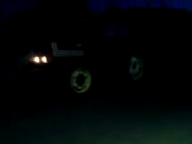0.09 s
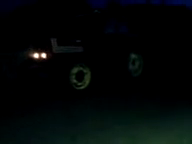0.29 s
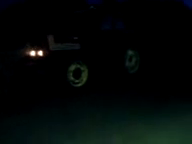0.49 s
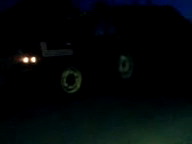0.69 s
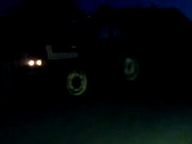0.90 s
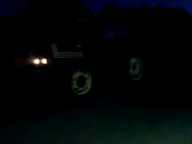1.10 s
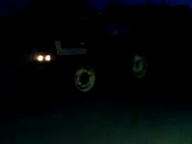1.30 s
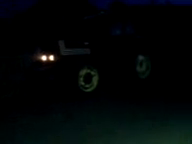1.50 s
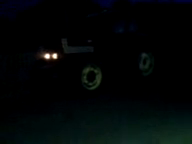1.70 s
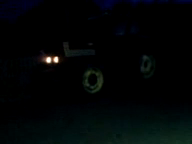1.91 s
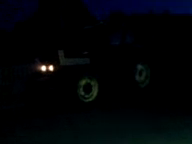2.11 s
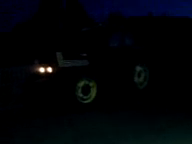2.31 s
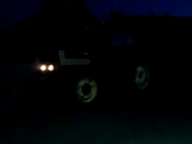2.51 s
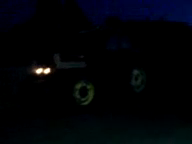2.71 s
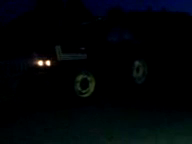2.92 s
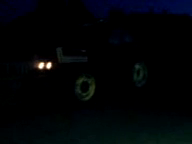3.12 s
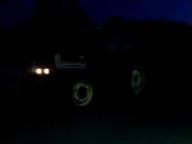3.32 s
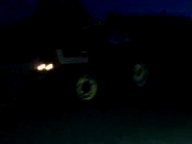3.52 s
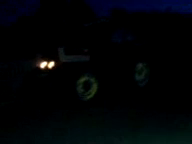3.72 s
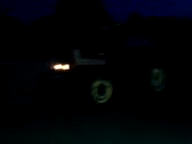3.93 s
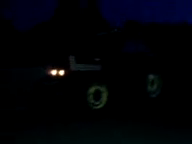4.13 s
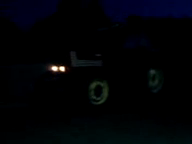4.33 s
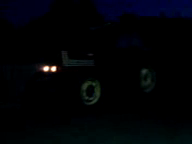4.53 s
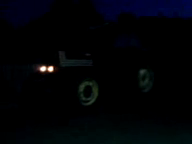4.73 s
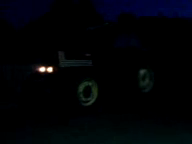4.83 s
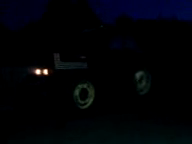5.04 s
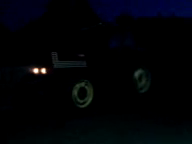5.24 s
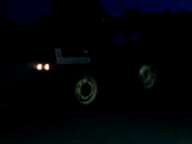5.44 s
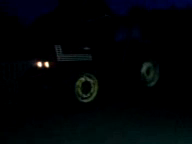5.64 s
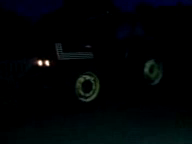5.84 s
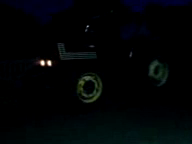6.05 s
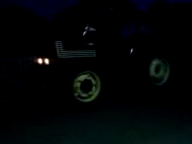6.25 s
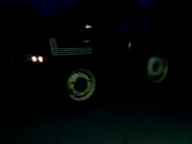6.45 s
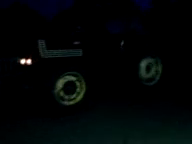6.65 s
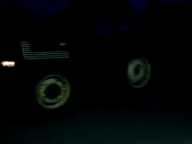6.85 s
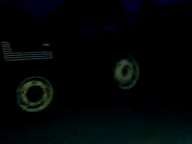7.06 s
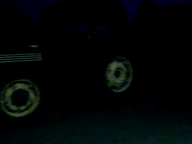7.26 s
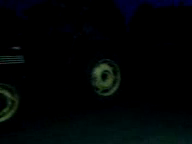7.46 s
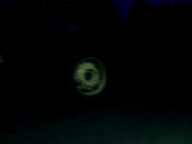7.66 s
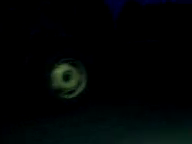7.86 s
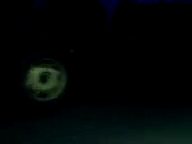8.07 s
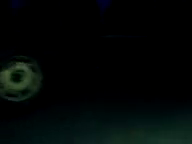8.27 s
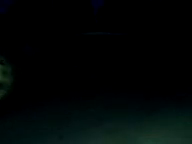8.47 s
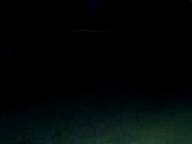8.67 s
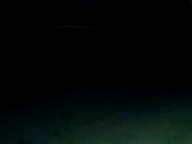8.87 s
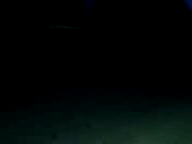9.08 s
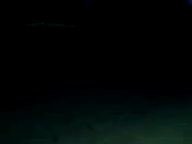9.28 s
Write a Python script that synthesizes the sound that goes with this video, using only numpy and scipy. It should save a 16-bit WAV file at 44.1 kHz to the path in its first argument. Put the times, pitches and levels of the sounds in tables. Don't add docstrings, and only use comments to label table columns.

```python
import sys
import numpy as np
from scipy import signal
from scipy.fft import rfft, irfft
from scipy.io import wavfile
from scipy.ndimage import uniform_filter1d

SR = 44100
rng = np.random.default_rng(int(sys.argv[2]) if len(sys.argv) > 2 else 0)


def wav_out(sig):
    wavfile.write(sys.argv[1], SR, np.round(np.clip(np.atleast_2d(sig).T, -1, 1) * 32767).astype(np.int16))


def volts(x):
    e = np.asarray(x, float) / 20
    return 10 ** e


N = 411894
T = np.arange(N) / SR

# t/s, engine cycle rate f/Hz, unevenness of the cylinders (0-1)
CRANK = [
    (0, 5.66, 1),
    (3.7, 5.665, 1),
    (3.85, 6.06, .75),
    (5.4, 6.05, .9),
    (6.25, 5.98, .9),
    (6.85, 8.55, .8),
    (8.2, 8.7, .75),
    (8.7, 8.7, .5),
    (9.34, 8.7, .4),
]
FIRST_TURN, CYLINDERS = .12, 6

# f/Hz, bandwidth/Hz, level/dB, ring-down of a firing/s
EXHAUST = [(103.4, 163.6, -8, 0.061), (320.93, 87.5, 0, 0.053), (430.2, 52, -6, 0.023),
           (297, 290, -0.5, 0.06)]
SUMP = [(812, 23, -5.5, 0.028), (1035, 230, 0.5, 0.02), (1143, 110, -6, 0.038), (923, 360, -2, 0.027)]
BLOCK = [(1418.8, 77, -6, 0.0089), (1488.5, 105.6, -5.5, 0.017), (1626, 127, -9, 0.0071),
         (1401.7, 577, 1.5, 0.036)]
TINWORK = [(2120, 198, -1, 0.0049), (2268, 140, -3, 0.021), (1912, 200, -1.5, 0.011),
           (2090, 700, -3.5, .01)]
FAN = [(2469.9, 110, -1, .012), (2683, 140, -2, 0.01), (3330, 910, -5.5, 0.036), (2830, 1626, 3, 0.03)]
GEARBOX = [(690, 113, -0.5, 0.024), (560, 260, 0, 0.023)]
PUMP = [(1299.4, 59, 0, 0.028), (1223.2, 150, -6.5, 0.02)]

EXHAUST_HITS = [(0, 0, 6, 0, 0, 0), (0, -4, 14, 7, 4, -4), (0, 0, 4, 10, 0, 0), (0, 0, 6, 3, 0, -3)]
SUMP_HITS = [(0, 0, 4, 9, 0, 6), (4, 0, 0, 8, 0, 0), (0, 0, 9, 4, 0, 0), (4, 0, 4, 0, 0, 0)]
BLOCK_HITS = [(18, 9, 3, -3, -8, -6), (11, 4, 11, 6, -8, -6), (9, 8, 0, 4, -6, -6), (9, 5, 6, 4, -8, -6)]
TINWORK_HITS = [(18, 0, 5, 9, -5, -3), (4, 0, 11, 12, -3, -3), (8, 0, 0, 8, -3, 3), (8, 2, 5, 5, -6, -3)]
FAN_HITS = [(6, 0, 5, 0, -3, 0), (9, 0, 0, 9, -3, -3), (13, 10, 0, 4, -6, 5), (8, 4, 4, 3, -6, -3)]
GEARBOX_HITS = [(0, 0, 0, 0, 5, 15), (0, 0, 4, 0, 0, 5)]
PUMP_HITS = [(3, -4, 18, 12, -6, -6), (0, 0, 11, 10, -4, -4)]
STEADY, KNOCK = 1.5, 1.3
KNOCK_WIDTH_HZ, SWELL_S, LONGEST_RING_S = 110, .011, .02

# t/s, nearness level/dB, clear view of the upper parts level/dB, turn of the flank level/dB
APPROACH = [(0, 2.5, 2, 0.5), (.6, 0, 0.5, 4), (1.3, 0, 1.5, 2), (2, 0, -1, 1.5), (2.45, -1.5, 0.5, -0.5),
            (2.7, -2, -3, -1.5), (3.3, -1, -5.5, -1.5), (3.7, -1, -6.5, -0.5), (4, 2, -0.5, -2.5),
            (4.701, 2, -1, -2.5), (5.6, 2.5, 0, -1.5), (6.2, 5.5, -1, 0), (6.85, 7, 1.5, 1),
            (7.5, 7, 3, 0.5), (8.1, 8, 3.5, 2), (8.55, 9, 6, 0), (8.95, 12, 10, -3.5), (9.34, 9.5, 10, -5)]
# level/dB, shares of nearness, of clear view and of turn (ratios)
PARTS = [
    (-28.5, 0.991, -0.04, -0.032),
    (-28, 0.83, -0.28, -1.2),
    (-26, 0.955, 0.63, 0.78),
    (-28.5, 0.922, 0.77, -0.243),
    (-28, 0.79, 1.046, -.1),
    (-34, 0.69, 0.6, -1.1),
    (-30, 0.13, 0.45, -0.17),
]
# t/s, level/dB
SHAKE = [(0, -2), (.7, -2.5), (1.35, 0.5), (1.7, -2), (2.4, 2), (3, 0.5), (3.65, -1.5), (4.7, -0.5),
         (5.7, 1.5), (6.35, -3), (6.85, 2.5), (7.05, -2), (7.3, 2), (8.1, -2.5), (8.5, 3.5), (8.72, -2),
         (9.34, 0)]
SHAKE_SHARES = (.1, 0.46, 0.2, 1.01, -0.15, -0.79, .1)
# t/s, level/dB
JOLTS = [
    (3.86, 3.5),
    (4.93, 1),
    (6.01, 2.5),
    (6.35, 1),
    (6.77, 1.5),
    (7.82, 2.5),
    (8.285, 2.5),
    (8.51, 1.5),
]
JOLT_RISE_S, JOLT_SETTLE_S = 0.011, 0.085

# t/s, pitch f/Hz, level/dB
BARKS = [
    [(0, 640, 1), (.014, 690, -15.5), (.045, 690, -17), (.085, 643.5, -21)],
    [(.048, 327.3, -20), (.078, 385.3, -7.5), (.116, 525.2, -3.5), (.126, 593.3, 6), (.162, 602.2, 6.5),
     (.178, 581.3, 7.5), (.185, 560, -7), (.199, 544, -7.5), (.204, 520, -26)],
    [(4.13, 503.7, -12.5), (4.149, 390.4, -18.5), (4.155, 416.3, -8), (4.167, 450, -5.5), (4.177, 579.2, 2),
     (4.218, 643.6, 6), (4.24, 621.6, 6.5), (4.255, 587, 3.5), (4.263, 560, -9)],
]
# hoarseness of break over start (ratio), overtones when clear level/dB,
# overtones gained when hoarse at the start level/dB, and at the break level/dB
VOICES = [(.6, -5.5, 1.5, 1.1), (3.9, -21, 19, 22), (1.5, -11.5, 12, 11)]
CLEAR_DB, CLEAR_ROUGH, ROUGH_PER_DB = 6, .04, 0.03
START_ROUGH = .28
# f/Hz, bandwidth/Hz, level/dB
THROAT = [(600, 180, -6.5), (1035, 1400, -17.5), (1820, 1600, -29.5)]
# delay t/s, then level/dB for each bark, as the dog turns its head
WALLS = [(.074, -9.5, -8.5, -8.5), (.083, -19, -16, -27), (.118, -13.5, -15, -17.5), (.147, -18, -26, -21),
         (.225, -25, -29.5, -30), (.3, -30.5, -37, -33.5)]

# t/s, peak level/dB
CLUNK = [
    (3.759, -2),
]
# f/Hz, level/dB, decay by 60 dB t/s
CLUNK_MODES = [(312, -5, 0.038), (520, 3, 0.017), (923, -7, 0.031), (1740, -7, 0.027), (2310, -10.5, 0.013),
               (3555, -2, 0.013)]

# f/Hz, level/dB
CHANNEL = [(20, -4), (60, -4), (200, -2.5), (300, 0.5), (3200, 1), (3600, -9), (4000, -15.5), (4250, -23.5),
           (4500, -40.5), (4600, -62), (4700, -97)]
KNEE, CEILING = .67, .71


def unit(x):
    return x / np.sqrt(np.mean(x ** 2))


def band(x, hz, width):
    return signal.lfilter(*signal.iirpeak(hz, hz / width, SR), x)


def walk(rate):
    k = int(SR / rate)
    held = np.repeat(rng.standard_normal(N // k + 1), k)
    return 1.5 * uniform_filter1d(uniform_filter1d(held, k), k)[:N]


def shaken(modes, hits, turns, uneven, scatter_db, flicker_db):
    firing = (turns * CYLINDERS).astype(int)
    starts = np.diff(firing, prepend=firing[0])
    out = 0
    for (hz, width, db, ring), hit_db in zip(modes, np.array(hits)):
        ring = min(ring, LONGEST_RING_S)
        size_db = scatter_db * rng.standard_normal(firing[-1] + 1)[firing]
        blows = starts * volts(size_db + uneven * hit_db[firing % CYLINDERS])
        decay = signal.lfilter([1], [1, -np.exp(-1 / (ring * SR))], blows)
        burst = STEADY + uniform_filter1d(decay, size=int(SWELL_S * SR))
        sharpness = min(KNOCK_WIDTH_HZ / width, 1) ** 2
        struck = KNOCK * sharpness * np.sqrt(ring * SR) * band(blows, hz, width)
        delay = int(rng.random() * SWELL_S * SR)
        drive = np.roll(burst * rng.standard_normal(N) + struck, delay)
        ringing = unit(band(band(drive, hz, width), hz, 2 * width))
        out = out + volts(db + flicker_db * walk(8.1)) * ringing
    return unit(out)


def tractor():
    s, cycle_hz, uneven = np.transpose(CRANK)
    turns = FIRST_TURN + np.cumsum(np.interp(T, s, cycle_hz)) / SR
    uneven = np.interp(T, s, uneven)
    s, *path_db = np.transpose(APPROACH)
    path_db = np.array([np.interp(T, s, c) for c in path_db])
    shake_db = np.interp(T, *np.transpose(SHAKE))
    jolt_db = np.zeros(N)
    for at, db in JOLTS:
        rise = np.clip((T - at) / JOLT_RISE_S + 1, 0, 1)
        jolt_db += db * rise * np.exp(-np.maximum(T - at, 0) / JOLT_SETTLE_S)
    parts = ((EXHAUST, EXHAUST_HITS), (SUMP, SUMP_HITS), (BLOCK, BLOCK_HITS), (TINWORK, TINWORK_HITS),
             (FAN, FAN_HITS), (GEARBOX, GEARBOX_HITS), (PUMP, PUMP_HITS))
    out = np.zeros(N)
    for (db, *shares), loose, (modes, hits) in zip(PARTS, SHAKE_SHARES, parts):
        gain = volts(db + np.dot(shares, path_db) + loose * shake_db)
        out += gain * shaken(modes, hits, turns, uneven, scatter_db=1.5, flicker_db=1.26)
    return volts(jolt_db) * out


def throat(hz):
    return sum(volts(db) / (1 + (2 * (hz - centre) / width) ** 2) for centre, width, db in THROAT)


def dog():
    out = np.zeros(N)
    pitch_tremble, level_tremble = walk(300), walk(200)
    breath = unit(band(rng.standard_normal(N), 1050, 300)) + unit(band(rng.standard_normal(N), 1700, 500))
    tail = rng.standard_normal(SR // 2) * np.exp(-np.log(1000) * T[:SR // 2] / 0.92)
    for j, bark in enumerate(BARKS):
        s, hz, db = np.transpose(bark)
        breaking, clear_db, start_db, break_db = VOICES[j]
        a, b = max(int(s[0] * SR), 0), int(s[-1] * SR)
        falling = T[a:b] > s[np.argmax(db)]
        hz, db = (np.interp(T[a:b], s, c) for c in (hz, db))

        weakness_db = np.maximum(CLEAR_DB - db, 0)
        rough = CLEAR_ROUGH + ROUGH_PER_DB * np.where(falling, breaking, 1) * weakness_db
        rough = np.clip(rough, 0, np.where(falling, 1, START_ROUGH))
        over_db = clear_db + np.where(falling, break_db, start_db) * np.sqrt(rough)

        phase = 2 * np.pi * np.cumsum(hz * (1 + .12 * rough * pitch_tremble[:b - a])) / SR
        overtones = sum(throat(k * hz) / throat(hz) * np.sin(k * phase + 0.67 * k) for k in range(2, 6))
        tone = np.sin(phase) + volts(over_db) * overtones
        hoarse = np.where(falling, .9, .15) * rough ** 2 * breath[:b - a]
        voice = np.zeros(SR)
        voice[:b - a] = volts(db + 3.6 * rough * level_tremble[:b - a]) * (tone + hoarse)

        dull = band(voice, 900, 1500)
        echoes = sum(volts(wall[1 + j]) * np.roll(dull, int(wall[0] * SR)) for wall in WALLS)
        reverberation = volts(-53.5) * signal.fftconvolve(dull, tail)[:SR]
        out[a:a + SR] += voice + echoes + reverberation
    return out


def clunk():
    out = np.zeros(N)
    t = T[:SR // 10]
    for s, peak_db in CLUNK:
        for lag, bounce_db in ((0, 0), (.006, -8.5)):
            blow = np.zeros(len(t))
            for hz, db, t60 in CLUNK_MODES:
                decay = np.exp(-np.log(1000) * t / t60)
                blow += volts(db) * np.sin(2 * np.pi * hz * t + 6 * rng.random()) * decay
            i = int((s + lag) * SR)
            out[i:i + len(t)] += volts(peak_db + bounce_db - 1.5) * blow
    return out


def scene():
    return (tractor() + dog() + clunk())[None]


def top_cut(x):
    return signal.sosfilt(signal.butter(12, 15935, fs=SR, output="sos"), x)


def record(dry):
    hz, db = np.transpose(CHANNEL)
    bins = np.maximum(np.arange(N // 2 + 1) * SR / N, 1)
    response_db = np.interp(np.log(bins), np.log(hz), db, right=-140)
    narrow = irfft(rfft(dry) * volts(response_db), N)
    under = np.clip(narrow, -KNEE, KNEE)
    room = CEILING - KNEE
    squared = under + room * np.tanh((narrow - under) / room)
    finished = signal.lfilter(*signal.butter(1, 7, "high", fs=SR), squared)
    return top_cut(finished)


dry = scene()
out = record(dry)
wav_out(out)
```